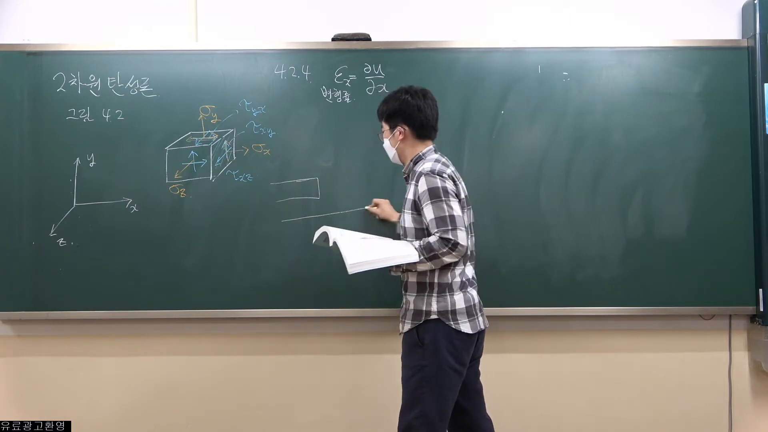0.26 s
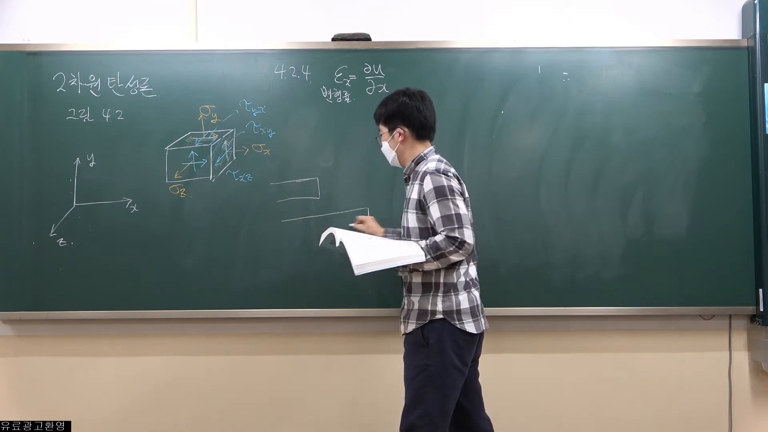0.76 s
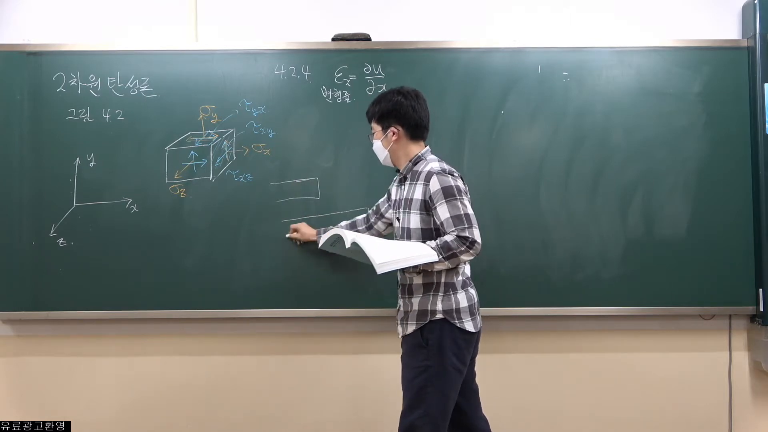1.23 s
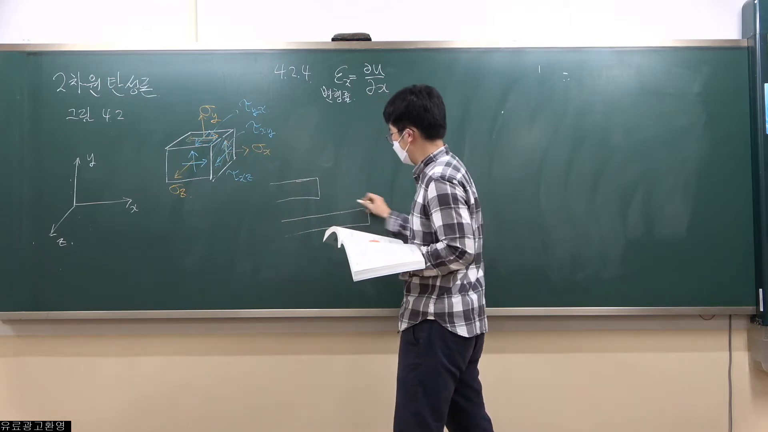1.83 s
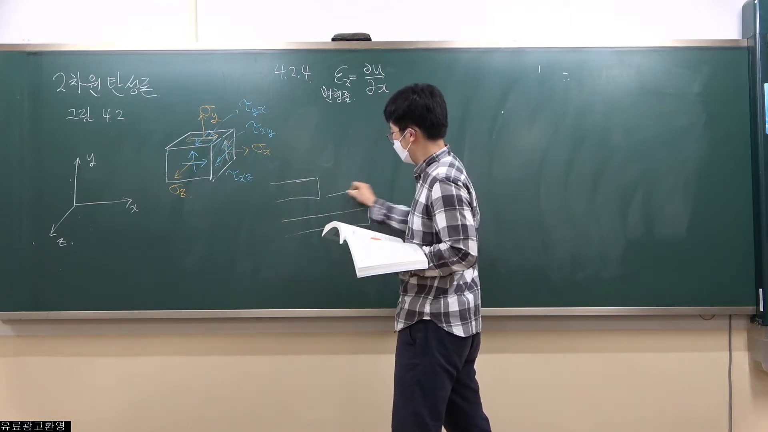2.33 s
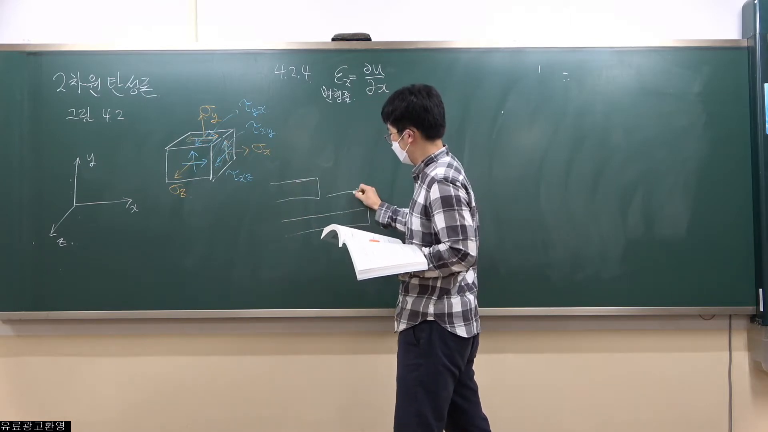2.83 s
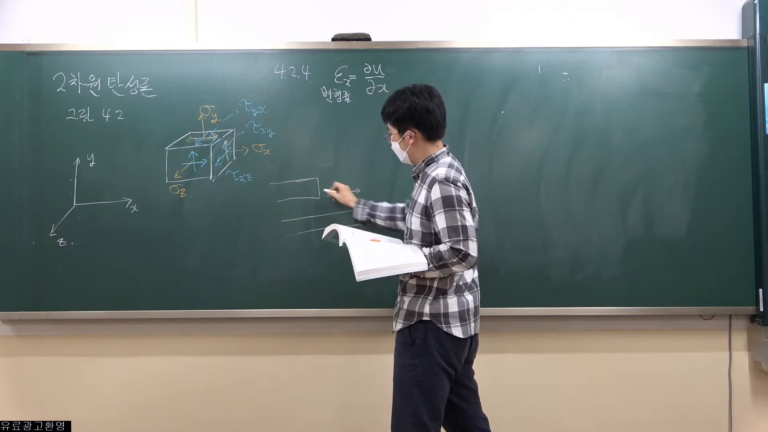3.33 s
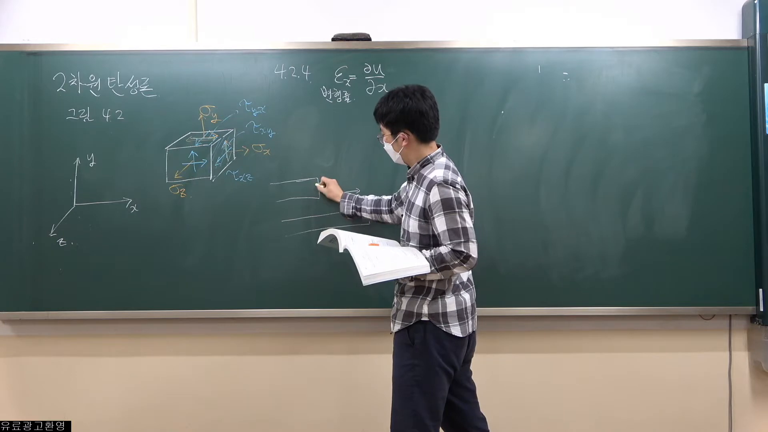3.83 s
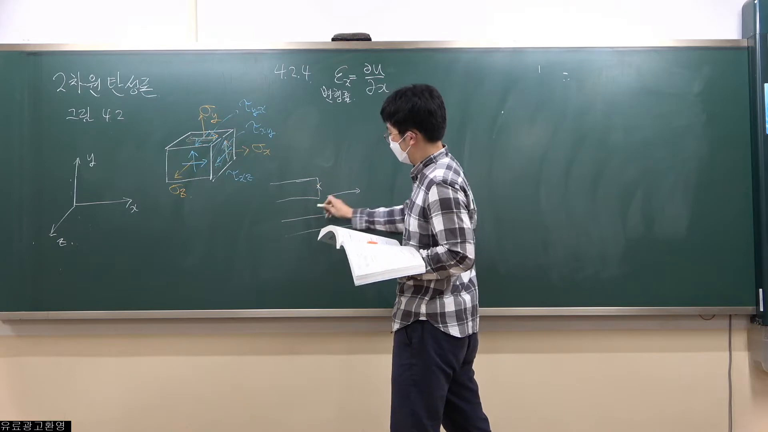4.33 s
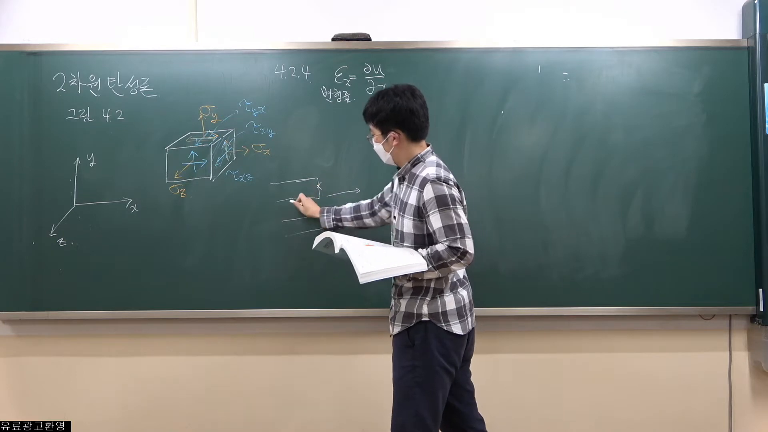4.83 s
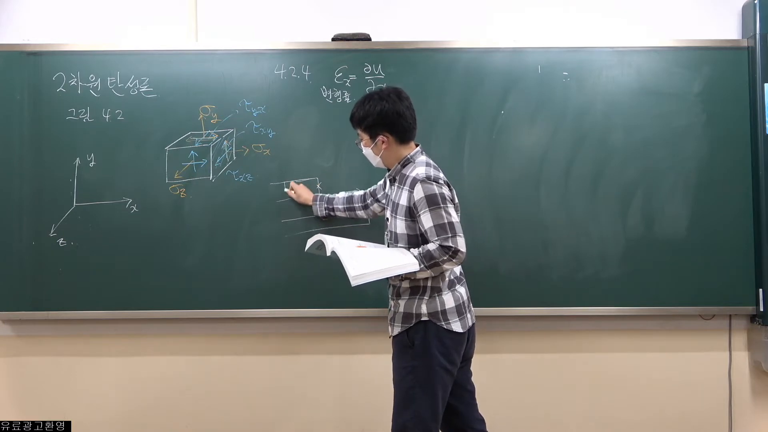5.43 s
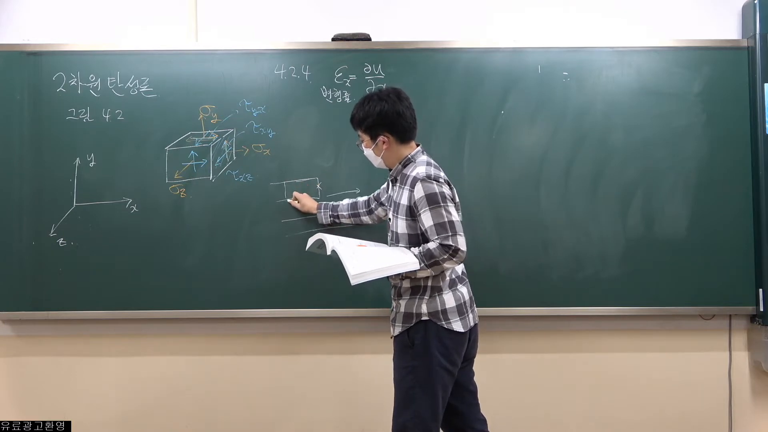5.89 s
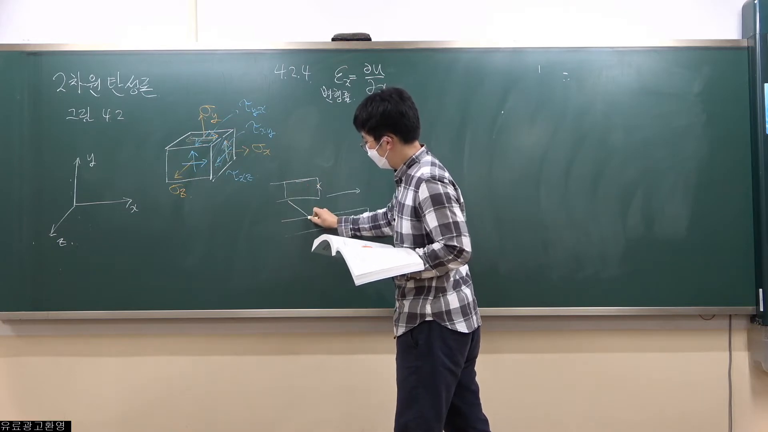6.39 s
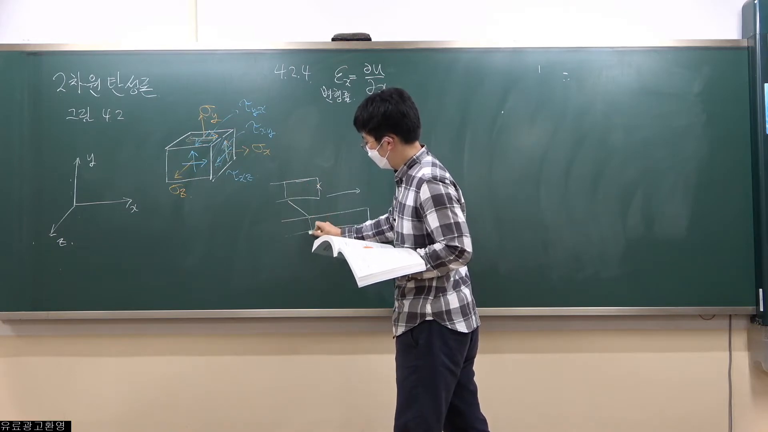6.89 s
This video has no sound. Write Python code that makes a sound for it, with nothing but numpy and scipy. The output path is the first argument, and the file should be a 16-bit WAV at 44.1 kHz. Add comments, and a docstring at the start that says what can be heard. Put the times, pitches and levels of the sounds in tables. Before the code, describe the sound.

Chalk on a blackboard, heard with plenty of room echo: first quick scrapes with tiny ticks, then a firm knock and a pause, a loud knock with a long scrape, a few softer taps and brief rubs, and finally several knocks with short strokes. The panel sounds hollow and woody, the rubbing dry and hissy. Soft low bumps from the floor and constant quiet ventilation sit underneath at a single microphone.

```python
"""Chalk knocks on and rules lines across a large blackboard in a quiet, echoing classroom.
Taps: minimum-phase pulses of tick, stick ring and hand weight, ringing the panel and the room.
Lines: random slips coloured as rasp and hiss, with a ring and a high whistle of the stick.
Below them: dull thuds and a swelling rumble, as of weight shifting on a hollow floor.
Background: steady ventilation and microphone hiss."""
import sys
import numpy as np
from scipy import signal
from scipy.fft import rfft, irfft, next_fast_len
from scipy.io import wavfile
from scipy.ndimage import map_coordinates

SR = 44100
rng = np.random.default_rng(int(sys.argv[2]) if len(sys.argv) > 2 else 0)


def inscribe(sig):
    """Save sig as 16-bit PCM at rate SR to the path in sys.argv[1].

    A 1-D sig is mono; a 2-D sig holds one channel per row.
    Samples are clipped to [-1, 1] before scaling.
    """
    pcm = np.round(np.clip(np.atleast_2d(sig).T, -1, 1) * 32767)
    wavfile.write(sys.argv[1], SR, pcm.astype(np.int16))


N = 315300
LEAD = SR  # samples simulated before time zero
TIME = np.arange(-LEAD, N) / SR
SIZE = next_fast_len(len(TIME) + SR)
HZ = np.fft.rfftfreq(SIZE, 1 / SR)


def amp(db):
    """Decibels to gain."""
    return 10 ** (np.asarray(db) / 20)


def unit(x):
    """Scaled to rms 1."""
    return x / np.sqrt(np.mean(x ** 2) + 1e-20)


def along(points, hz):
    """(Hz, value) points interpolated on a log frequency axis."""
    point_hz, value = np.transpose(points)
    return np.interp(np.log(hz + 1), np.log(point_hz + 1), value)


def hump(hz, centre_hz, width_hz):
    """The shape of a resonance, 1 at its centre."""
    return 1 / (1 + (2 * (hz - centre_hz) / width_hz) ** 2)


def softness(hz, corner_hz, slope=4.1):
    """A contact of finite length passes little above its corner."""
    return 1 / np.sqrt(1 + (hz / corner_hz) ** (2 * slope))


def wobble(knots_per_s, size):
    """A smooth random curve through evenly spaced knots."""
    position = np.arange(size) * knots_per_s / SR
    return map_coordinates(rng.standard_normal(4096), [position], mode="wrap")


def noise(spectrum):
    """Coloured noise of rms 1."""
    coloured = rfft(rng.standard_normal(SIZE)) * amp(along(spectrum, HZ))
    return unit(irfft(coloured, SIZE)[:len(TIME)])


def pulse(gain):
    """The minimum-phase pulse, peak 1, shaped by a gain over evenly spaced frequencies."""
    size = 2 * (len(gain) - 1)
    cepstrum = irfft(np.log(gain + 1e-6))
    cepstrum[1:size // 2] *= 2  # fold onto positive time: causal
    cepstrum[size // 2 + 1:] = 0
    shape = irfft(np.exp(rfft(cepstrum)))
    return shape / np.abs(shape).max()


def add(track, start_s, sound):
    """Mix a sound into a track at a time."""
    start = round(start_s * SR) + LEAD
    track[start:start + len(sound)] += sound[:len(track) - start]


# Chalk touching the board; the first is only still echoing. Each row: time in s, peak of the direct
# pulse in dB, contact corner in Hz, tick in dB, stick ring in Hz, ring width in Hz, ripple in dB.
TAPS = [(-.27, -9, 1400, -14, 3900, 800, 0.5), (.281, -37, 2480, -14, 2640, 180, -2),
        (.35, -37.5, 2300, -10, 2720, 230, 0), (.561, -39, 2500, -4, 2620, 400, -0.5),
        (.8083, -40, 3500, 7, 3920, 400, 2), (1.2407, -11.5, 2060, -6.5, 3980, 330, 3),
        (2.1418, -6, 1290, -13.5, 3970, 900, 0.5), (2.594, -12.5, 1180, -16.5, 3900, 800, .5),
        (3.6033, -17, 920, -28, 2100, 900, 0), (3.824, -14, 1400, -13.5, 4020, 600, 0),
        (4.9883, -37, 2600, 0, 4200, 500, 4.5), (5.2488, -10, 1660, -14.5, 3890, 280, 0),
        (5.8533, -4.5, 2220, -5, 3990, 500, 0.5), (6.3616, -11, 1860, -10.5, 4010, 300, 0),
        (6.985, -35, 2200, -14, 2180, 450, 0)]
# Panel's answer to a hard blow. Each row: frequency in Hz, gain in dB.
PANEL_GAIN = [(25, -27), (60, -16), (105, -5), (250, -6.5), (450, -3), (800, -1), (1100, -1), (1400, -2.5),
              (2100, -2), (3100, -7.5), (4100, -10.5), (5000, -11), (7000, -22.5), (10000, -25),
              (15000, -29)]
# Resonances of the panel in its frame. Each row: frequency in Hz, width in Hz, lift in dB.
PANEL_MODES = [(85, 8.2, 2.5), (111, 20, 6), (163.4, 7.5, 7), (362, 13, 6.5), (456.7, 24, 6.5),
               (522, 21.5, 6.5), (663, 56, 5.5), (758, 43, 4), (863, 92, 2.5), (1009, 82, 4),
               (1230, 25, -1.5), (1574, 21, -1.5), (1680, 14, 0), (1800, 24, 4), (2015, 30, 1),
               (2120, 44, 4)]
# A soft, long contact carries more of the hand's weight than a hard, short one.
USUAL_CORNER_HZ, THUMP_DB, THUMP_DB_PER_OCTAVE, HAND_HZ = 1700, 2, -11, 280
TICK_TOP_HZ = 21700  # reach of a 0 dB tick; a weaker one is duller
RING_STRENGTH_HZ = 850  # a loose grip rings narrow and high: at this width the amplitude doubles
# Just below its ring the stick works against the panel and leaves a notch.
NOTCH_RATIO, NOTCH_WIDTH_HZ, NOTCH_SHARE = 0.852, 240, 0.73  # share of the ring's lift in dB
RIPPLE_SPACING_HZ = 760


def taps():
    """The tip ticks, the stick rings briefly, and the hand's weight thumps the panel."""
    out = np.zeros(len(TIME))
    hz = np.fft.rfftfreq(8192, 1 / SR)
    panel_db = along(PANEL_GAIN, hz)
    for mode_hz, width_hz, lift_db in PANEL_MODES:
        panel_db = panel_db + lift_db * hump(hz, mode_hz, width_hz)
    for start_s, peak_db, corner_hz, tick_db, stick_hz, width_hz, ripple_db in TAPS:
        tick_top_hz = TICK_TOP_HZ * np.sqrt(amp(tick_db))
        tick = amp(tick_db) * softness(hz, tick_top_hz, slope=2.5)
        thump_db = THUMP_DB + THUMP_DB_PER_OCTAVE * np.log2(corner_hz / USUAL_CORNER_HZ)
        hand = amp(thump_db * softness(hz, HAND_HZ, slope=3.5))
        contact = np.hypot(softness(hz, corner_hz), tick) * hand
        # bending waves return from the nearest batten and ripple the spectrum
        ripple = ripple_db * np.cos(2 * np.pi * hz / RIPPLE_SPACING_HZ) * softness(hz, 3000)
        notch = NOTCH_SHARE * hump(hz, NOTCH_RATIO * stick_hz, NOTCH_WIDTH_HZ)
        stick_db = 20 * np.log10(1 + RING_STRENGTH_HZ / width_hz)
        body = amp(panel_db + ripple + stick_db * (hump(hz, stick_hz, width_hz) - notch))
        blow = -pulse(contact * body)  # the panel first gives way: pressure drops
        add(out, start_s, amp(peak_db) * signal.fftconvolve(blow, paths(ring_db=6, room_db=7.0)))
    return out


# One gesture for all lines: gather speed (longer on a long line), ease the pressure, lift off.
RUN_UP_S, RUN_UP_SHARE, EASE_DB_PER_S, LIFT_S = 0.038, 0.25, 8.5, 0.058


def drag(t, length_s):
    """How strongly the chalk rubs, t seconds into a line."""
    run_up_s = RUN_UP_S + RUN_UP_SHARE * length_s
    speed = np.sin(np.pi / 2 * np.clip(t / run_up_s, 0, 1)) ** 2
    lift = np.clip((length_s - t) / LIFT_S, 0, 1)
    return speed * amp(-EASE_DB_PER_S * t) * lift


# Lines drawn. Each row: start in s, end in s, hiss in dB, rasp in dB, stick ring in Hz, ring lift in dB,
# whistle in Hz, whistle width in Hz, whistle lift in dB.
STROKES = [(-.05, 0.362, -63.5, 4, 2640, 5, 12200, 3500, 6.5),
           (0.371, 0.587, -59, -3.5, 2520, 10, 11800, 2400, 12),
           (0.601, 0.967, -63, -2, 3960, 9, 11700, 1900, 12),
           (0.801, 1.655, -59.5, -1, 5200, 8.5, 14000, 2200, 0),
           (2.131, 3.04, -58, -0.5, 4750, 9.5, 12900, 420, 6),
           (3.609, 3.8, -63.5, 5.5, 3940, -6, 11600, 1300, 13.5),
           (3.853, 4.035, -64.5, 1.5, 4400, 0, 12200, 1400, 3),
           (4.339, 5.06, -60.5, 5.5, 4800, 6.5, 12700, 450, 6.5),
           (5.031, 5.325, -68.5, 3.5, 4730, -1, 12900, 400, 5),
           (5.261, 5.646, -62.5, -1.5, 3900, 10.5, 12400, 2000, -1.5),
           (5.869, 6.274, -56.5, -2, 5000, 9, 12100, 1800, 3.5),
           (6.359, 6.915, -62, 0.5, 4120, 9.5, 12200, 1200, 3),
           (6.891, 7.056, -61, 3, 4960, 2, 13200, 2500, 1.5),
           (7.02, 7.25, -72, 0, 5100, 1, 13200, 2500, -2)]
# Low rubbing sound. Each row: frequency in Hz, relative level in dB.
RASP = [(60, -40), (200, 26), (700, 16), (1300, 13), (2200, 12), (3300, 8.5), (5000, 4.5), (7000, 0),
        (10000, -17), (16000, -15)]
# High rubbing sound. Each row: frequency in Hz, relative level in dB.
HISS = [(2000, -34), (5000, -7), (8000, -1), (11000, 1), (14500, 5.5), (16000, -4)]


def scrapes(slips_per_s=7000, slip_db=3, judder_db=1.0, waver_db=0.55, ring_width_hz=450):
    """Chalk crumbles in tiny slips; each grip gives the stick its own ring and high whistle."""
    out = np.zeros(len(TIME))
    t, hz = np.arange(SR) / SR, np.fft.rfftfreq(SR, 1 / SR)
    for start_s, end_s, hiss_db, rasp_db, ring_hz, ring_db, whistle_hz, width_hz, whistle_db in STROKES:
        slips = (rng.random(SR) < slips_per_s / SR) * rng.standard_normal(SR)
        slips *= amp(slip_db * rng.standard_normal(SR))
        slips *= amp(judder_db * wobble(66.7, SR) + waver_db * wobble(16.7, SR))
        colour = np.hypot(amp(along(HISS, hz)), amp(rasp_db + along(RASP, hz)))
        colour *= amp(ring_db * hump(hz, ring_hz, ring_width_hz))
        colour *= amp(whistle_db * hump(hz, whistle_hz, width_hz))
        # hiss_db sets the level of this band; the rasp comes on top
        hiss_band = (hz > 10500) * (hz < 15500)
        colour /= np.sqrt(np.mean(colour ** 2 * hiss_band))
        rub = irfft(rfft(unit(slips)) * colour, SR)
        line = amp(hiss_db) * drag(t, end_s - start_s) * rub
        tail = decay(ROOM_T60, size=SR, colour=ABSORBED)
        add(out, start_s, line)
        add(out, start_s, amp(1.5) * signal.fftconvolve(line, tail))
    return out


# Dull thuds. Each row: time in s, peak of the direct pulse in dB, contact corner in Hz.
THUDS = [(.8, -40, 220), (.894, -36, 330), (.94, -38.5, 550), (0.979, -35, 390), (1.026, -38, 350),
         (1.125, -44, 396), (3.725, -36.5, 240), (3.756, -29, 237), (4.576, -51, 447), (5.202, -31.5, 440),
         (6.986, -28.5, 446), (7.029, -37, 430)]
# Spectrum of a thud. Each row: frequency in Hz, gain in dB.
THUD_GAIN = [(25, -6), (60, -1.5), (105, -0.5), (180, 7.5), (350, 3.5), (1000, -4.5), (5000, -47),
             (15000, -24)]


def thuds():
    """Soft, heavy contacts boom in the room."""
    out = np.zeros(len(TIME))
    hz = np.fft.rfftfreq(4096, 1 / SR)
    for start_s, peak_db, corner_hz in THUDS:
        push = pulse(softness(hz, corner_hz) * amp(along(THUD_GAIN, hz)))
        add(out, start_s, amp(peak_db) * signal.fftconvolve(push, paths(ring_db=6.5, room_db=10.0)))
    return out


# Shifts of weight. Each row: time of the top in s, length in s, rumble rms at the top in dB.
SHIFTS = [(0.908, 0.44, -45), (2.615, 0.079, -41), (3.755, 0.28, -43), (4.375, 0.23, -45.5),
          (4.618, 0.13, -44), (5.988, 0.38, -43)]
# Spectrum of the rumble. Each row: frequency in Hz, relative level in dB.
RUMBLE = [(20, -22), (50, -7), (75, 4), (110, 8), (170, -6.5), (300, -14.5), (500, -8), (900, -53),
          (3000, -78)]
REST_DB = -57  # rumble rms between the shifts


def rumble():
    """Low noise in the floor that swells with each shift of weight."""
    swells = np.zeros(len(TIME))
    for top_s, length_s, top_db in SHIFTS:
        swells += amp(top_db) * np.exp(-(2 * (TIME - top_s) / length_s) ** 2)
    return np.hypot(amp(REST_DB), swells) * noise(RUMBLE)


# Spectrum of ventilation and microphone hiss. Each row: frequency in Hz, relative level in dB.
AIR = [(20, -5), (50, 6), (110, 0), (250, -2.5), (600, -13), (1200, -9.5), (2500, -21.5), (5000, -26),
       (9000, -28.5), (15500, -28)]


def air():
    """Steady coloured noise of the ventilation and the microphone."""
    return amp(-54.0) * noise(AIR)


def decay(t60s, size, colour=((1000, 0),)):
    """Dense random ringing, each frequency dying at its own speed; about unit power gain at 1 kHz."""
    hz, t, bins = signal.stft(rng.standard_normal(size), SR, nperseg=256)
    fall_db = -60 * t / along(t60s, hz)[:, None]
    bins = bins * amp(along(colour, hz)[:, None] + fall_db)
    tail = signal.istft(bins, SR, nperseg=256)[1][:size]
    return tail * np.sqrt(2 * np.log(1000) / (SR * along(t60s, 1000)))


# Near surfaces. Each row: echo delay in s, level in dB.
WALLS = [(.0037, -7), (.0062, -4), (0.0141, -5), (0.0242, -17.5)]
# Ringing of the panel. Each row: frequency in Hz, 60 dB decay time in s.
PANEL_T60 = [(100, 0.074), (700, 0.28), (2000, 0.33), (5000, 0.13), (12000, 0.2)]
# Reverberation of the room. Each row: frequency in Hz, 60 dB decay time in s.
ROOM_T60 = [(80, 1.05), (300, 1.79), (900, 2.04), (2000, 1.95), (4000, 1.41), (8000, 0.99), (15000, 0.13)]
# What the walls give back. Each row: frequency in Hz, gain in dB.
ABSORBED = [(500, 1), (1200, 0), (2500, -2.5), (4500, -3.5), (12000, 3.5)]
TAIL = 3 * SR // 2  # samples of room tail


def paths(ring_db, room_db, ring_build_s=0.00027, room_build_s=0.0048):
    """Direct sound, near echoes, panel ring and room tail, drawn anew for every spot struck."""
    t = np.arange(TAIL) / SR
    ring = decay(PANEL_T60, size=SR // 4)
    ring *= 1 - np.exp(-t[:len(ring)] / ring_build_s)
    room = decay(ROOM_T60, size=TAIL, colour=ABSORBED)
    response = amp(room_db) * room * (1 - np.exp(-t / room_build_s))
    response[:len(ring)] += amp(ring_db) * ring
    response[0] += 1  # direct sound
    for delay_s, echo_db in WALLS:
        spot_delay_s = abs(delay_s * rng.normal(1, .02))
        response[round(spot_delay_s * SR)] += amp(echo_db)
    return response


def scene():
    """Chalk, shifting weight and background air at one microphone."""
    return (taps() + scrapes() + thuds() + rumble() + air())[None, LEAD:]


TOP_HZ = 15850


def record(dry):
    """Nothing is kept above the band limit."""
    return irfft(rfft(dry, SIZE) * (HZ < TOP_HZ), SIZE)[:, :N]


dry = scene()
out = record(dry)
inscribe(out)
```